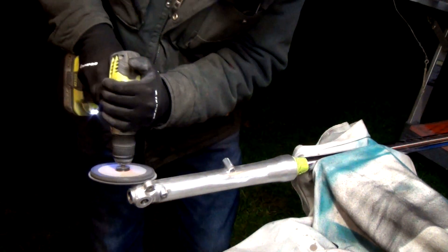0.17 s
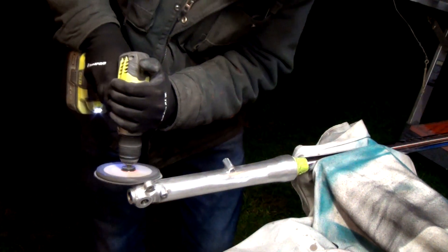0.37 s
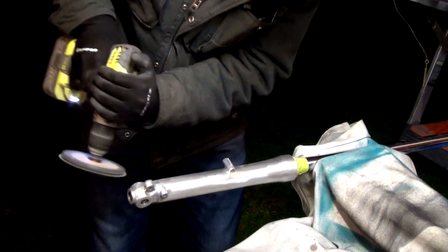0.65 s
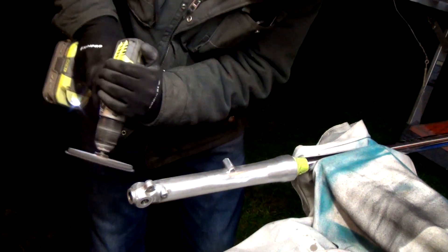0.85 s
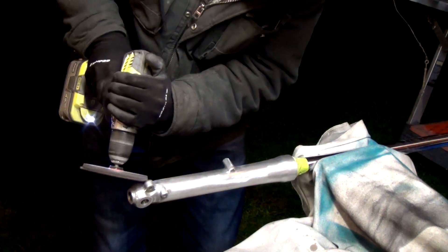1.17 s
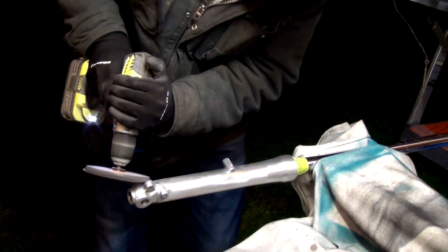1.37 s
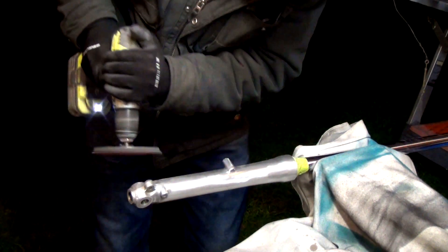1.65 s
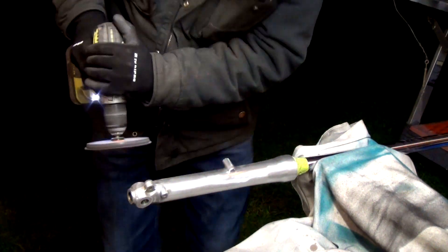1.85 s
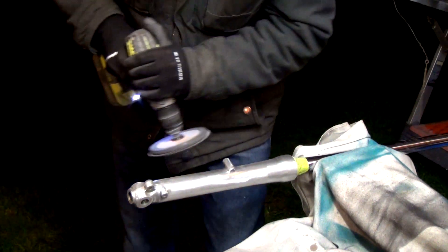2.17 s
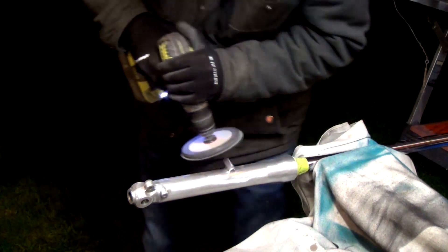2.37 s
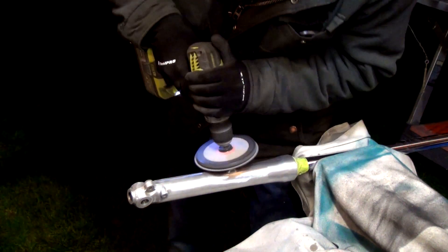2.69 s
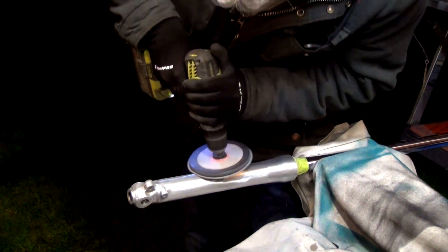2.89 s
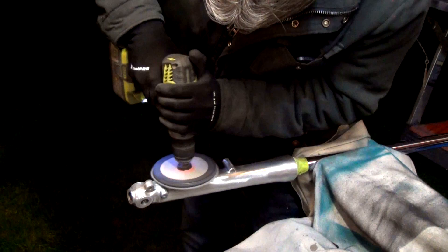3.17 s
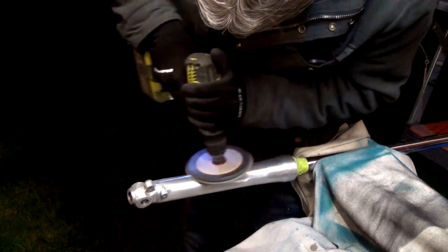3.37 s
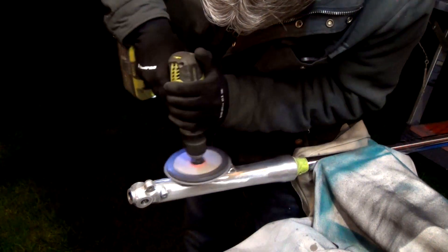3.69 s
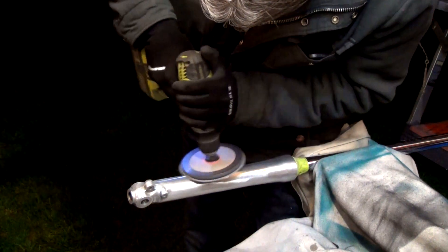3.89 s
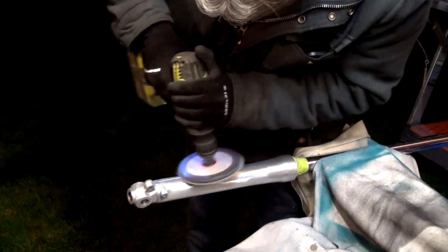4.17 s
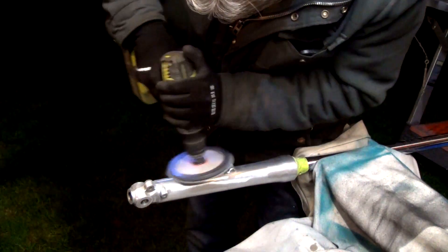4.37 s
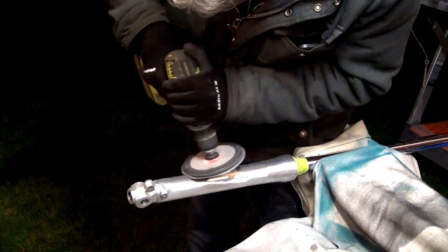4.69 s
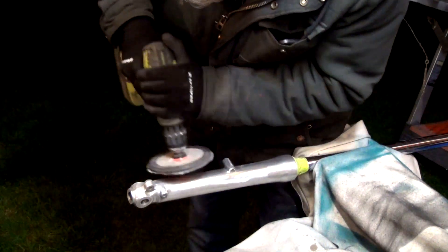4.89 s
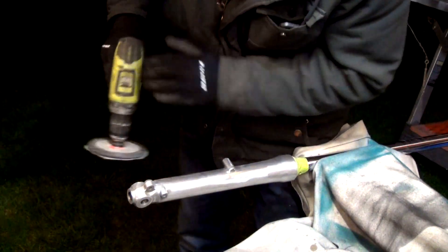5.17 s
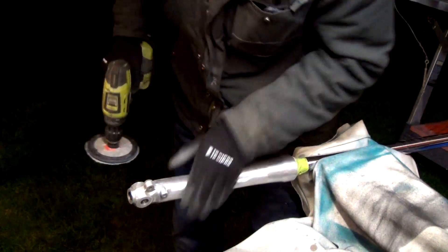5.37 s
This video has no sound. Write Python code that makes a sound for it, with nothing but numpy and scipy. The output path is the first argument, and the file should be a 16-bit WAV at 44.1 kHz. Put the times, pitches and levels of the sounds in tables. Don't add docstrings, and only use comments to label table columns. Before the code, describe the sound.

Very close, dry stereo pickup in a quiet workshop: an electric drill whines at full speed, gritty disc strokes scratch a hollow tube early on, then again for about two seconds with one strong sag in pitch. The whine slides down with a brushy hiss and stops, leaving faint room tone, jacket and glove rustle, light metallic ticks and soft thuds.

```python
import sys
import numpy as np
from scipy import signal
from scipy.fft import rfft, irfft, next_fast_len
from scipy.io import wavfile
from scipy.ndimage import uniform_filter1d, map_coordinates

SR = 44100
rng = np.random.default_rng(int(sys.argv[2]) if len(sys.argv) > 2 else 0)


def int16_out(signal):
    q = np.round(np.clip(np.atleast_2d(signal).T, -1, 1) * 32767)
    wavfile.write(sys.argv[1], SR, q.astype(np.int16))


def volts(x):
    e = np.asarray(x, float) / 20
    return 10 ** e


N = 244308
T = np.arange(N) / SR

# start/s, end/s, rasp level/dB, fine grit re rasp/dB, tube boom level/dB
STROKES = [(.23, 0.398, -47.5, -8, -57), (.4, 0.589, -47.5, 0.7, -52), (1.227, 1.327, -54, 6, -57),
           (1.326, 1.445, -47.5, 3, -50), (1.455, 1.546, -53.5, 2.5, -51.5), (2.92, 3.24, -49, -3, -60.5),
           (3.237, 3.359, -47.5, -3, -57.5), (3.364, 3.495, -47.5, -0.5, -55.5),
           (3.493, 3.679, -48, -0.3, -54.5), (3.68, 3.767, -54.5, 4.3, -61), (3.77, 3.82, -53, -2, -74),
           (3.822, 4.062, -48.5, -0.5, -54), (4.063, 4.316, -49, 0.8, -54.5),
           (4.321, 4.508, -45.5, -1.2, -53), (4.5, 4.754, -44.5, -3, -53), (4.746, 4.83, -44.5, 5, -53)]
# f/Hz, width/Hz, level/dB
TUBE = [(182.2, 42, 0), (1440, 100, -38), (2240, 270, -16.5), (2850, 100, -7), (3940, 30, -32),
        (5670, 140, -9), (9600, 110, -45)]
FREE_HZ = 293.5
SLOT_LAW_DB = 38
TOUCH_S = 0.035


def unit(x):
    return x / np.sqrt(np.mean(x ** 2) + 1e-20)


def along(points, hz):
    f, v = np.transpose(points)
    return np.interp(np.log(hz + 1), np.log(f + 1), v)


def curves(rows):
    s, *cols = np.transpose(rows)
    return [np.interp(T, s, c) for c in cols]


def wobble(rate_hz, count=1):
    knots = rng.standard_normal((count, int(N * rate_hz / SR) + 4))
    return np.array([map_coordinates(k, [T * rate_hz], order=1) for k in knots]).squeeze()


def filtered(x, response):
    m = next_fast_len(N + 8192)
    return irfft(rfft(x, m) * response(np.fft.rfftfreq(m, 1 / SR)), m)[..., :N]


def coloured(x, spectrum):
    return unit(filtered(x, lambda hz: volts(along(spectrum, hz))))


def ringing(x, modes):
    def response(f):
        total = 0
        for k, (centre, width, db) in enumerate(modes):
            band = 1j * f * width
            total = total + (-1) ** k * volts(db) * band / (centre * centre - f * f + band)
        return total
    return filtered(x, response)


def patchy(patchy_db):
    z = signal.stft(rng.standard_normal(N), nperseg=512)[2]
    field = uniform_filter1d(uniform_filter1d(rng.standard_normal(z.shape), 6, 0), 10, 1)
    return signal.istft(z * volts(patchy_db * unit(field)), nperseg=512)[1][:N]


def held(start_s, end_s, rise_s, fall_s):
    rise = np.clip((T - start_s[:, None]) / rise_s, 0, 1)
    return rise * np.clip(1 - (T - end_s[:, None]) / fall_s, 0, 1)


def rotor_speed():
    # t/s, speed lost/Hz
    pushes = [
        [(.24, 0), (.381, 13), (.463, 15), (.531, 21), (.578, 15.6), (.628, 5.3), (.66, 2.8), (.74, 0)],
        [(1.29, 0), (1.345, 2.4), (1.429, 11.5), (1.463, 9), (1.494, 3.8), (1.6, 0)],
        [(2.94, 0), (2.986, 3.4), (3.093, 7.7), (3.122, 5.6), (3.163, 5.5), (3.193, 9.2)],
        [(3.279, 11.5), (3.34, 44), (3.42, 74), (3.49, 87), (3.524, 74), (3.565, 41.6), (3.6, 24), (3.66, 11.5),
         (3.75, 2.5)],
        [(3.83, 1.9), (3.889, 10), (3.934, 7.3), (3.993, 14.3), (4.034, 11.7), (4.091, 15.2), (4.127, 11.8),
         (4.2, 16.4), (4.32, 11)],
    ]
    # t/s, speed/Hz
    coast = [
        (4.379, 271.8),
        (4.401, 251.2),
        (4.56, 135),
        (4.62, 105),
        (4.78, 40),
        (4.9, 5),
    ]
    pushed = [(s, FREE_HZ - lost) for push in pushes for s, lost in push]
    return curves(pushed + coast)[0] + .4 * wobble(5)


def slot_whine(angle, load, decades):
    # t/s, level/dB
    slot = [(0, -28.5), (.2, -33.5), (.32, -34), (.63, -34.5), (.696, -28.5), (1.1, -35.5), (1.33, -30.5),
            (1.57, -30), (1.8, -35), (1.887, -30), (1.96, -33), (2.113, -30.5), (2.45, -33.5),
            (2.776, -26.5), (3.26, -29), (3.9, -30), (4.48, -33), (4.62, -44)]
    # t/s, half width/s, depth/dB
    nulls = [(.265, .02, 4), (.32, .02, 4), (.385, .02, 6), (.444, .015, 6), (.5, .028, 24), (.57, .016, 8),
             (1.27, .05, 3), (1.375, .04, 9), (1.483, .025, 7), (1.7, .12, 14), (2.236, .12, 13),
             (3.11, .05, 4.5), (3.33, .02, 4), (3.385, .04, 7), (3.49, .05, 13), (3.62, .04, 3),
             (3.57, .02, 6), (4.03, .04, 4), (4.095, .035, 11), (4.175, .04, 9), (4.24, .045, 10),
             (4.315, .025, 4)]
    nulls_db = sum(db * np.clip(1 - abs(T - s) / half, 0, 1) for s, half, db in nulls)
    level_db = curves(slot)[0] - nulls_db + SLOT_LAW_DB * decades
    flutter_db = (.8 + 2.5 * load) * wobble(50)
    return volts(level_db + flutter_db) * np.sin(12 * angle - 4 * decades * wobble(150))


def fifth_order(angle, speed, load, decades):
    # t/s, level/dB
    fifth = [(0, -51), (.3, -49), (.65, -46.5), (1, -48.5), (1.25, -50), (1.6, -47), (1.9, -48),
             (2.15, -53), (2.4, -47.5), (2.9, -56), (3.03, -44), (3.3, -56), (3.8, -49), (4.3, -49.5)]
    law_db, sway_db = 33, 2.3
    shell_hz, shell_width_hz, shell_db = 1060, 67, 8
    level_db = curves(fifth)[0] + law_db * decades + sway_db * wobble(4) + (1 + 3 * load) * wobble(25)
    level_db += shell_db / (1 + ((5 * speed - shell_hz) / shell_width_hz) ** 2)
    return volts(level_db) * np.sin(5 * angle + (1.2 * load - 4 * decades) * wobble(60))


def beamed_orders(angle, load, decades, beam_db):
    # order/1, level/dB, share of the beam followed/1
    beamed = [(20, -48, .35), (25, -49.5, .1), (31, -48, 1.)]
    load_loss_db = 9
    out = np.zeros(N)
    for k, db, share in beamed:
        sway_db = 2.5 * wobble(25) + 2.5 * wobble(6)
        level_db = db + share * beam_db - load_loss_db * load + SLOT_LAW_DB * decades + sway_db
        out += volts(level_db) * np.sin(k * angle + 0.64 * wobble(80))
    return out


def weak_orders(angle, load, decades):
    # order/1, level/dB
    clear = [(3, -58.5), (4, -58.3), (8, -63.0), (9, -63.2), (10, -51.6), (11, -58.2), (14, -59.5),
             (15, -53.9), (16, -62.8), (18, -60.9), (19, -63.4), (21, -60.3), (22, -54.3), (23, -57.2),
             (24, -53.2), (26, -51.7), (27, -51.0), (28, -54.0), (29, -54.8), (30, -51.9), (32, -57.9),
             (33, -57.7), (34, -54.2), (35, -50.8), (36, -60.4), (39, -62.5), (40, -56.5), (49, -62.0),
             (50, -60.4), (51, -62.9)]
    faint = (2, 6, 7, 13, 17, 37, 38, 41, 42, 45, 52)
    orders = clear + [(k, -66) for k in faint]
    count = len(orders)
    flutter = wobble(4, count) + wobble(25, count)
    phase = rng.uniform(0, 2 * np.pi, (count, 1)) + 2 * wobble(2, count)
    out = np.zeros(N)
    for (k, db), f, p in zip(orders, flutter, phase):
        out += volts(db + 3 * f - .9) * np.sin(k * angle + p)
    return volts(25 * decades - 6 * load) * out


def whine(turns, speed, load, decades, hum_db, beam_db):
    hum_law_db, hum_load_db = 46, 3
    jitter_hz = (.12 + .7 * load) * wobble(70)
    angle = 2 * np.pi * (turns + np.cumsum(jitter_hz) / SR)
    out = volts(hum_db - hum_load_db * load + hum_law_db * decades) * np.sin(angle)
    out += slot_whine(angle, load, decades)
    out += fifth_order(angle, speed, load, decades)
    out += beamed_orders(angle, load, decades, beam_db)
    return np.sqrt(2) * (out + weak_orders(angle, load, decades))


def whir(turns, speed, load, decades, facing_db):
    # f/Hz, level/dB
    whir_spectrum = [(190, -30.5), (330, -19), (430, -23.5), (880, -16.5), (1450, -9), (2180, -6),
                     (3400, -7), (4950, -15.5), (5900, -11), (7400, -9.5), (9300, -11), (11000, -17.5),
                     (13000, -24), (14800, -22.5)]
    # f/Hz, width/Hz, level/dB
    housing = [(508.4, 19.5, 7), (1073, 40, 7.1)]
    full_speed_db, gear_law_db, gear_load_db, vent_law_db = -33.5, 16.5, -1, 26
    gears_free_hz = 53.3
    meshing_db = 20 * np.log10(np.clip(speed / gears_free_hz - .55, 1e-4, .7) / .7)
    gear_db = full_speed_db - gear_load_db * load + gear_law_db * decades + meshing_db
    beat = 1 + .08 * np.cos(2 * np.pi * turns) + .08 * np.cos(4 * np.pi * turns)
    noise = coloured(beat * patchy(patchy_db=1.5), whir_spectrum)
    noise = noise + ringing(noise, housing)
    vents = filtered(noise, lambda hz: 1 / (1 + (4800 / (hz + 1)) ** 8))
    turned = noise - vents + volts(facing_db + vent_law_db * decades) * vents
    return volts(gear_db + 0.28 * wobble(6.6)) * turned


def shop():
    # f/Hz, level/dB
    shop_spectrum = [(12, -57), (20, -27), (42, -17), (106, -7), (161, -3.5), (324, -7), (405, -6),
                     (440, -8.5), (615, -13), (668, -10.5), (1420, -13), (5100, -27), (8900, -27),
                     (15500, -36)]
    return volts(-61) * coloured(rng.standard_normal(N), shop_spectrum)


def rasp(turns, decades):
    # f/Hz, level/dB
    rasp_spectrum = [(180, -46), (300, -9.5), (360, -20), (631, -21), (1000, -8), (1300, -10.5),
                     (1440, -3.5), (1640, -5), (2790, -1.5), (3080, -7), (3460, -1), (4730, -3), (9160, -2),
                     (11000, -13.5), (15500, -14)]
    gear_ratio, law_db = 19, 33
    start, end, rasp_db, fine_db, _ = np.transpose(STROKES)
    touch = held(start, end, TOUCH_S, 0.043)
    press_db = .9 * np.cos(4 * np.pi * turns / gear_ratio) + .5 * wobble(8) + .9 * wobble(150)
    grit = unit(patchy(patchy_db=1.5)) * volts(2.5 * np.clip(rng.standard_normal(N), -3, 2.2))
    snags = (rng.random(N) < 60 / SR) * rng.uniform(-1, 1, N) * 6
    scratch = coloured(unit(grit) + snags, rasp_spectrum)
    scratch = unit(volts(press_db) * (scratch + 1.2 * ringing(scratch, TUBE[1:])))
    fine = filtered(scratch, lambda hz: 1 / (1 + (5600 / (hz + 1)) ** 10))
    rough = volts(rasp_db + 19) @ touch * (scratch - fine)
    bright = volts(rasp_db + 17 + fine_db) @ touch * fine
    return volts(law_db * decades) * (rough + bright)


def tube_boom(decades):
    law_db = 10
    start, end, _, _, boom_db = np.transpose(STROKES)
    mode = ringing(ringing(rng.standard_normal(N), TUBE[:1]), TUBE[:1])
    boom = unit(volts(1.8 * wobble(25.33)) * mode)
    return volts(law_db * decades) * (volts(boom_db) @ held(start, end, TOUCH_S, 0.053)) * boom


def tube_sing():
    # start/s, end/s, f/Hz, level/dB
    singing = (.41, .485, 3130, -38)
    start_s, end_s, hz, db = singing
    gain = held(np.array([start_s]), np.array([end_s]), .02, .02)[0]
    return volts(db) * gain * np.sin(2 * np.pi * hz * T + .6 * wobble(60))


def bench_thumps():
    # t/s, peak level/dB
    thump_times = [
        (2.355, -39),
        (4.63, -59),
        (5.477, -37),
    ]
    pushes = np.zeros(N)
    for s, db in thump_times:
        pushes[round(s * SR)] = volts(db + 38.5)
    return ringing(filtered(pushes, lambda hz: 1 / (1 + 1j * hz / 300) ** 2), [(150, 90, 0)])


def brush_drag():
    # t/s, level/dB
    drag = [
        (4.3, -69),
        (4.45, -43),
        (4.6, -41.5),
        (4.75, -46),
        (4.86, -50),
        (4.885, -60),
        (4.9, -110),
    ]
    # f/Hz, level/dB
    brush_spectrum = [(1760, -51), (3000, -27), (3240, -28), (3870, -25), (5200, -34), (5650, -8),
                      (8660, -1.5), (10800, -9.5), (15500, -8.5)]
    return volts(curves(drag)[0] + 0.73 * wobble(90)) * coloured(rng.standard_normal(N), brush_spectrum)


def cloth():
    # start/s, end/s, rustle level/dB, thud level/dB
    moves = [
        (4.824, 4.87, -64, -74),
        (4.934, 5.058, -71, -80),
        (5.07, 5.106, -73, -58),
        (5.133, 5.224, -71.5, -66),
        (5.218, 5.428, -72.5, -85),
        (5.442, 5.487, -57, -54),
        (5.492, 5.6, -57.5, -57),
    ]
    # f/Hz, level/dB
    rustle_spectrum = [(350, -35), (600, -9), (832, -20), (2720, -8.5), (3670, -4), (4040, -8.5),
                       (9260, -7), (11100, -16), (15500, -15)]
    start, end, rustle_db, thud_db = np.transpose(moves)
    moving = held(start, end, .018, 0.023)
    rustle = coloured(volts(1.7 * wobble(200)) * rng.standard_normal(N), rustle_spectrum)
    thud = unit(ringing(rng.standard_normal(N), [(196, 73, 0)]))
    return volts(rustle_db + 2.0) @ moving * rustle + volts(thud_db - 4.5) @ moving * thud


def small_ticks():
    # t/s, level/dB
    tick_times = [(4.9322, -41), (4.944, -51), (4.953, -49), (4.965, -51), (4.9766, -48), (4.987, -52),
                  (4.9964, -48), (5.4484, -45), (5.4535, -43), (5.4605, -41)]
    t = np.arange(2000) / SR
    out = np.zeros(N + len(t))
    for s, db in tick_times:
        burst = volts(db + 2.5 - 60 * t / 0.027) * np.sign(rng.standard_normal(len(t)))
        out[round(s * SR):][:len(t)] += burst
    return filtered(out[:N], lambda hz: 1 / (1 + (1500 / (hz + 1)) ** 4) / (1 + (hz / 4800) ** 3))


def two_ports(near):
    # f/Hz, left minus right/dB
    lean = [(60, -3), (110, 3.5), (200, -3), (380, -1), (700, 4), (1290, 2), (2380, 1.5), (4400, 1.5),
            (8120, 0.5), (15000, 2)]
    # f/Hz, level/dB
    apart = [(60, -32), (500, -13), (1500, -17.5), (3500, -49), (5200, -18), (6500, -13.5), (9000, -18.5),
             (10500, -21), (13000, -22)]
    ports = np.array([[.5], [-.5]])
    direct = filtered(near, lambda hz: volts(ports * along(lean, hz)))
    tail = rng.standard_normal(3000) * volts(-60 * np.arange(3000) / SR / .05)
    scattered = signal.fftconvolve(near, tail / np.linalg.norm(tail))[:N]
    return direct + 2 * ports * filtered(scattered, lambda hz: volts(along(apart, hz)))


def scene():
    # t/s, vent facing/dB, unbalance hum through the grip/dB, upper-order beam/dB
    hands = [(0, 0, -58, 9.5), (.16, -2, -57.5, 2.5), (.4, 6, -57, 9), (.65, 0, -56, 6.5),
             (.9, -.5, -53.5, 3), (1.12, .5, -57, 1), (1.25, 2, -59.5, 2), (1.5, 2, -58, -8),
             (1.62, -0.5, -56, -3), (1.85, 0, -49.5, -4), (2.08, -5, -48.5, -7), (2.2, -0.5, -50.5, 4),
             (2.32, 0.5, -47, -1), (2.44, -0.5, -49, 8), (2.9, 0, -52.5, -3), (3.3, 3, -53, 7),
             (3.8, -3, -53.5, -10), (4.35, -0.5, -57, -7)]
    speed = rotor_speed()
    turns = np.cumsum(speed) / SR
    load = np.clip((1 - speed / 292) / .05, 0, 1)
    decades = np.log10(speed / FREE_HZ)
    facing_db, hum_db, beam_db = curves(hands)
    near = whine(turns, speed, load, decades, hum_db, beam_db)
    near += whir(turns, speed, load, decades, facing_db) + shop()
    near += rasp(turns, decades) + tube_boom(decades) + tube_sing()
    near += bench_thumps() + brush_drag() + cloth() + small_ticks()
    return two_ports(near)


def band_limit(x):
    return signal.sosfilt(signal.butter(12, 15690, fs=SR, output="sos"), x)


def record(dry):
    def response(hz):
        dip_db = -2.5 * np.exp(-((hz - 5055) / 400) ** 2)
        return volts(dip_db) / np.sqrt(1 + (hz / 15500) ** 40)
    return band_limit(filtered(dry, response))


dry = scene()
out = record(dry)
int16_out(out)
```